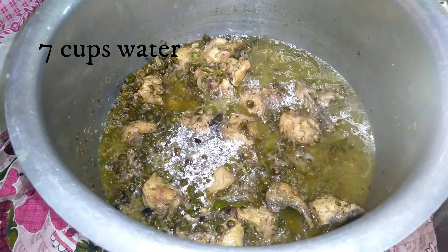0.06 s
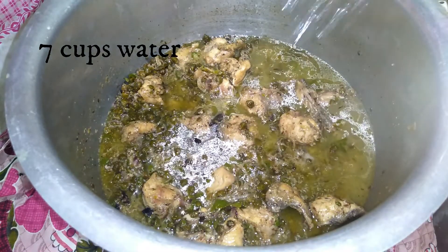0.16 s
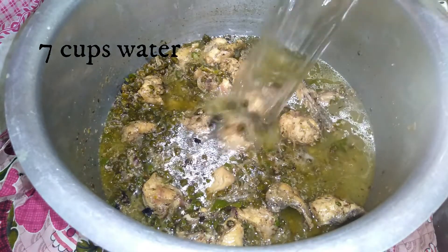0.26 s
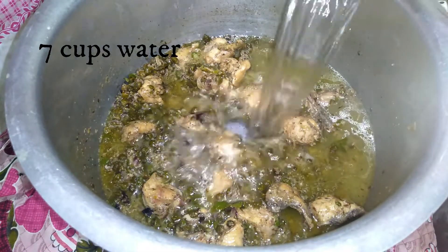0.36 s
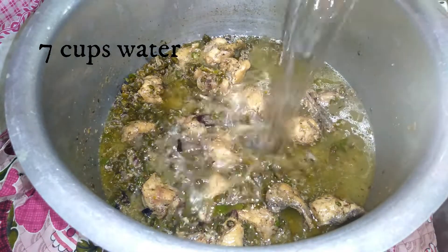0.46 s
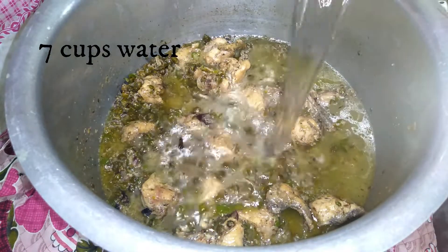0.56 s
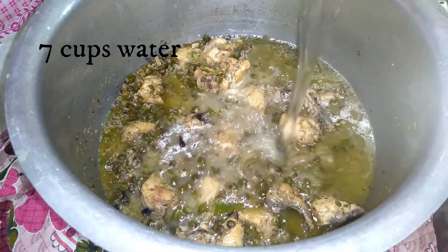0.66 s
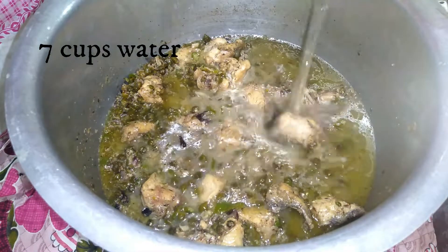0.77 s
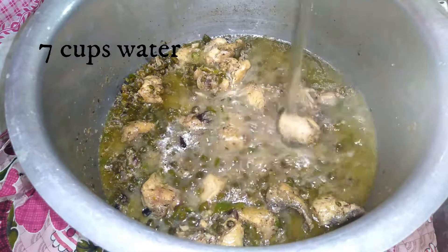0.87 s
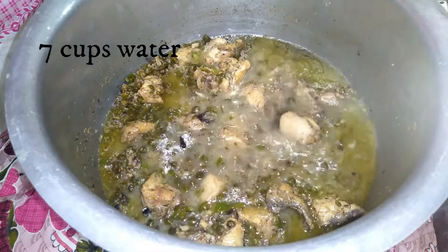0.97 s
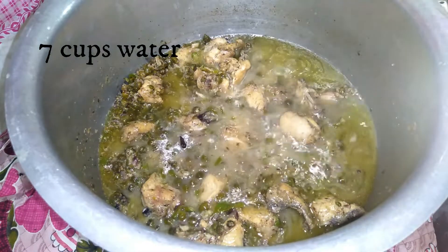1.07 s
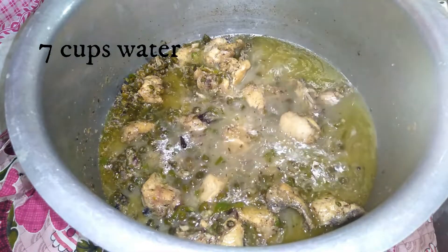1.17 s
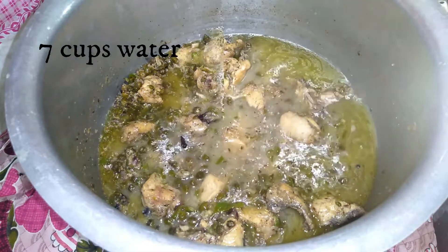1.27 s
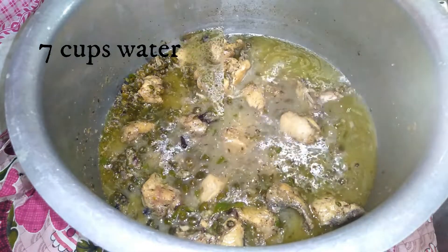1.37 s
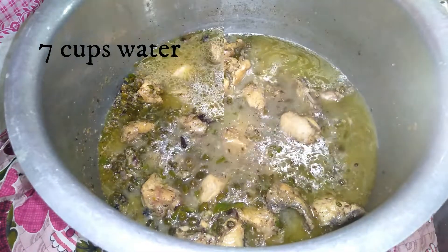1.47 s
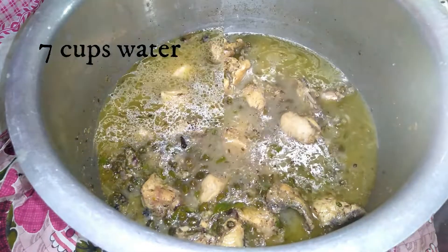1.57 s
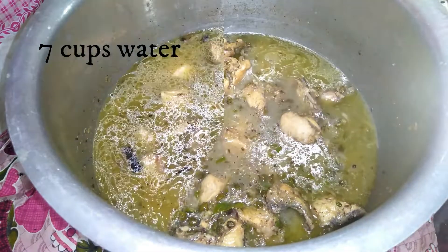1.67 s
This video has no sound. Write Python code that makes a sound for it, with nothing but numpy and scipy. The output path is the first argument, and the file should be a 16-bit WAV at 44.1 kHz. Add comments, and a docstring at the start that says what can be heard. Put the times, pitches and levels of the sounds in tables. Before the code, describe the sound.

Close in stereo, a stream of water hits a pot of frying masala, splattering and plopping with a hollow metallic ring, then dies away to delicate froth and oil spits over a very low kitchen hum.

```python
"""Over a low, wavering kitchen hum, the sizzle of masala rises in a large metal pot, close to a stereo
microphone: a dense cloud of very short rings, held under the pour. Water is poured in: clouds of short rings
make its splash, gurgle and spray, with single pops and plops. The pot's air rings along and its walls scatter
the sound. Then pour and sizzle fade, leaving soft prickles of froth and spitting oil, and the sizzle returns in
two surges, the second still growing when the sound ends."""
import sys
import numpy as np
from scipy import signal
from scipy.fft import rfft, irfft
from scipy.io import wavfile

SR = 44100
rng = np.random.default_rng(int(sys.argv[2]) if len(sys.argv) > 2 else 0)


def put_to_file(sound):
    """Save the sound as 16-bit audio at rate SR, in the file named by the first command-line argument."""
    columns = np.atleast_2d(sound).T  # one column per channel
    safe = np.clip(columns, -1, 1)
    whole_steps = np.round(safe * 32767)
    wavfile.write(sys.argv[1], SR, whole_steps.astype(np.int16))


N = 74970
T = np.arange(N) / SR  # time of each sample, s

# Layer levels below are set before the layer trims, the pot and the microphone.
# strength of the kitchen hum, added to the level of its tones [t/s, level/dB]
HUM_LEVEL = [(0, -4), (.07, -22), (.2, 1.5), (.45, 4), (.95, 2.5), (1.2, -7.5), (1.4, 0), (1.55, -9),
             (1.58, 3), (1.7, -5.5)]
# tones of the kitchen hum [f/Hz, level/dB]
HUM_TONES = [(131.8, -68), (113.8, -74)]
# outline of the low rumble [f/Hz, level/dB]
RUMBLE_OUTLINE = [(20, -9.5), (42, -19.5), (65, -0.5), (95, 4), (125, 0.5), (170, -9.5), (250, -23.5),
                  (450, -29), (1200, -38), (5000, -56), (15000, -34)]
# air resonances of the pot [f/Hz, level/dB, time to fall by 60 dB/s]
POT_RESONANCES = [(261.5, -11.5, 0.2), (352, -17, 0.15), (864, -8, 0.15), (910, -9, 0.095),
                  (1478, -1.5, 0.18), (1952.5, -1.5, 0.11), (2754, -15, .1), (3060, -4, .3)]
# the walls scatter mainly the treble [f/Hz, level/dB]
WALLS_OUTLINE = [(300, -17), (1000, -17.5), (2200, 3), (15000, -3)]
# level of the sizzle: a faint hiss rising by 0.17 s, held under the pour, fading, then returning # in two
# surges, the second lasting to the end [t/s, level/dB]
SIZZLE_LEVEL = [(0, -100), (.125, -93.5), (.17, -56.5), (.2, -60), (.235, -63), (1.0, -62.5), (1.2, -87),
                (1.38, -93.5), (1.408, -70), (1.45, -62), (1.49, -72.5), (1.555, -77), (1.595, -64),
                (1.7, -59.5)]
# outline of the sizzle [f/Hz, level/dB]
SIZZLE_OUTLINE = [(200, -14.5), (800, -26), (1250, -10.5), (2000, 0.5), (3700, 7), (4300, -2), (5800, 4.5),
                  (9000, -8.5), (15000, -16.5)]
# oil fizzing as the water settles [t/s, level/dB]
FIZZ_LEVEL = [(.95, -48), (1.08, -65.5), (1.19, -60), (1.26, -62.5), (1.36, -63.5), (1.45, -62), (1.5, -72),
              (1.55, -67), (1.6, -59), (1.7, -66)]
# outline of the fizz [f/Hz, level/dB]
FIZZ_OUTLINE = [(1000, -58), (3800, -16), (5200, -7.5), (7000, -4.5), (10000, -3), (12000, 1), (14500, 0.5)]
# small clusters of bubbles surfacing after the pour [t/s, level/dB]
FROTH_CLUSTERS = [(1.172, -74), (1.208, -83.5), (1.283, -73.5)]
# sharp drop slaps and oil spits [t/s, peak level/dB, f/Hz, ring time/ms]
POP_EVENTS = [(0.226, -31, 5500, 0.27), (0.234, -28, 10900, 0.45), (.2380, -14.5, 5640, 0.92),
              (0.3358, -18.5, 5200, 1.1), (0.4008, -21.5, 10860, 1.2), (0.406, -14, 10860, 0.77),
              (0.4697, -29, 4840, 0.47), (0.636, -24.5, 5840, 1.4), (.7270, -10, 5700, 0.54),
              (0.738, -17.5, 6200, 1.4), (0.8332, -21.5, 5020, 2.6), (0.9148, -26, 5510, 2.6),
              (1.1520, -29.5, 11500, 0.4), (1.1760, -35.5, 10750, 2.1), (1.2326, -38, 9600, 0.81),
              (1.2905, -43.5, 10200, 2.5), (1.349, -41, 10130, 0.67), (1.356, -44.5, 10500, .7),
              (1.4318, -37.5, 10370, 0.48), (1.4613, -38, 9970, 1.3), (1.554, -33.5, 11200, 0.46)]
# larger bubbles and plunges [t/s, peak level/dB, f/Hz, ring time/ms]
PLOP_EVENTS = [(0.237, -56.5, 208, 11), (.243, -60, 764, 25), (0.242, -29, 1470, 1.9),
               (0.322, -43, 352, 33), (.342, -27.5, 2264, 3.9), (.395, -25, 2330, 3.3),
               (0.427, -21, 2570, 4.8), (0.4796, -23.5, 3020, 3.7), (.507, -38, 904, 3.9),
               (0.505, -24, 2675, 3.3), (0.5192, -16, 2735, 1.9), (.525, -32, 1990, 6.5),
               (0.696, -44.5, 275.4, 12), (0.738, -28.5, 1496, 4), (0.752, -37.5, 1520, 22),
               (1.049, -58, 274, 20)]
# fine spray thrown up by the stream [t/s, level/dB]
SPRAY_LEVEL = [(.2, -85), (.25, -58), (.262, -43), (.29, -41), (.34, -41), (.362, -45), (.41, -44),
               (.53, -47), (.575, -50), (.715, -51), (.73, -44), (.83, -44.5), (.96, -48), (1.01, -57),
               (1.1, -68), (1.22, -80)]
# outline of the spray [f/Hz, level/dB]
SPRAY_OUTLINE = [(300, -36), (2000, -20.5), (3500, -1), (4800, -0.5), (6500, 1), (8000, -3), (10500, -2.5),
                 (15000, -7.5)]
# water plunging into the pool, then settling [t/s, level/dB]
GURGLE_LEVEL = [(.22, -84), (.24, -74.5), (.293, -82), (.312, -51.5), (.47, -51), (.515, -48.5), (.56, -50),
                (.67, -59), (.88, -54.5), (.97, -60.5), (1.1, -85.5), (1.16, -89.5), (1.2, -99),
                (1.53, -101), (1.58, -100), (1.7, -100)]
# outline of the gurgle [f/Hz, level/dB]
GURGLE_OUTLINE = [(60, -28), (140, -7), (250, 3), (400, 2), (650, -1.5), (880, 4.5), (1250, -3.5),
                  (2500, -17), (8000, -54.5)]
# the stream breaking on the food [t/s, level/dB]
SPLASH_LEVEL = [(0.22, -66.5), (0.26, -41.5), (0.282, -42.5), (0.298, -38.5), (0.326, -44.5), (0.342, -32),
                (0.356, -44.5), (0.493, -41), (0.508, -33), (0.53, -39.5), (0.544, -44.5), (0.688, -51.5),
                (0.734, -42.5), (0.89, -49.5), (0.948, -45), (1.038, -68), (1.2, -91.5)]
# outline of the splash [f/Hz, level/dB]
SPLASH_OUTLINE = [(150, -24), (700, -29.5), (1200, -14), (1500, -2), (2000, -4), (2850, 1), (3600, -1.5),
                  (4400, -7.5), (8000, -23.5), (15000, -67)]
# tone of the left microphone port [f/Hz, level/dB]
LEFT_OUTLINE = [(100, 4), (1400, 2.5), (2500, 2), (3400, -1), (4500, 5.5), (5700, 9), (6700, 5),
                (8000, -2.5), (9200, -8), (11000, -13), (14000, -18.5)]
# tone of the right microphone port [f/Hz, level/dB]
RIGHT_OUTLINE = [(100, 4.5), (1400, 2.5), (3000, -2.5), (4500, 1.5), (6200, -1), (8200, 3.5), (9400, 7),
                 (10300, 9.5), (11200, 4), (12200, 2), (14000, -3)]

# trims of whole layers, dB
RUMBLE_DB, SIZZLE_DB, SPRAY_DB, GURGLE_DB, SPLASH_DB = -72, 1.5, 3, 1, 0
# pops: trim, share of crack noise, its fading time, rise time, its spread around the pitch
POP_DB, POP_CRACK, CRACK_S, POP_RISE_S, CRACK_OCTAVES = -1.5, 0.52, 0.00081, 0.0001, 1
# plops: trim, rise time, phase speed-up per ring time (a share)
PLOP_DB, PLOP_RISE_S, PLOP_GLIDE = -3.5, 0.0027, 0.0037
FROTH_S = 0.014  # half-width of a cluster, where it has sunk to 1/e
# levels of pot resonances, walls and room, and the times their echoes take to fall by 60 dB
POT_DB, WALLS_DB, WALLS_T60_S, ROOM_DB, ROOM_T60_S = 10.5, -1, 0.03, -8, 0.13
PLACES_PER_S = 100  # how often the sound moves to another place in the pot
DIRECT = 0.11  # share of pops and plops that reaches the microphone directly
EDGE_HZ = 14450  # upper band limit


def amp(db):
    """Turns decibels into a gain."""
    return 10 ** (np.asarray(db) / 20)


def evened(x):
    """Scales a sound to an rms strength of one."""
    return x / np.sqrt(np.mean(x ** 2) + 1e-20)


def level(curve):
    """Follows a (t/s, level/dB) curve as a gain, falling by 600 dB per second outside it."""
    s, db = np.transpose(curve)
    outside_s = abs(T - np.clip(T, s[0], s[-1]))
    return amp(np.interp(T, s, db) - 600 * outside_s)


def convolve(x, h):
    """Filters each channel, keeping the length."""
    return signal.fftconvolve(np.atleast_2d(x), np.atleast_2d(h), axes=1)[:, :N]


def colour(x, outline, size=4096):
    """Filters to an (f/Hz, level/dB) outline, never answering before the sound arrives."""
    f, db = np.transpose(outline)
    log_f = np.log(abs(np.fft.fftfreq(size, 1 / SR)) + 1)
    log_gain = np.log(amp(np.interp(log_f, np.log(f), db)))
    # the Hilbert transform supplies the phase that packs the response towards its start
    response = np.fft.ifft(np.exp(np.conj(signal.hilbert(log_gain)))).real
    return convolve(x, response[:size // 2])


def drift(hz, count=24):
    """Adds sines of random phase, up to the given rate, into a wander of unit rms."""
    rates = np.geomspace(hz / 10, hz, count)
    return evened(sum(np.sin(2 * np.pi * (f * T + rng.random())) for f in rates))


def bubbles(per_s, low_hz, high_hz, cycles, spread_db, glide, apart, count=32):
    """Scatters short rings of random size, each pitch group at its own place; glide lifts the pitch."""
    out = np.zeros((2, N))
    for hz in np.linspace(low_hz, high_hz, count):
        chance = rng.random(N)
        size = np.minimum(rng.exponential(1, N), 4)
        place = rng.uniform(-1, 1)
        hits = (chance < per_s / count / SR) * amp(spread_db * size) * rng.choice([-1, 1], N)
        # the place sets how late the ring arrives left and right (apart is in ms)
        delay_s = apart / 1000 * np.array([[1 + place], [1 - place]])
        age = np.maximum(T[:N // 16] - delay_s, 0) * hz / cycles
        phase = 2 * np.pi * cycles * age * (1 + glide * np.minimum(age, 2))
        ring = np.exp(-age) * np.sin(phase)
        out += convolve(hits, ring / np.linalg.norm(ring[0]))
    return evened(out)


def kitchen():
    """A hum of steady pitches, wavering in level and phase, over low rumble made of noise."""
    noise = rng.standard_normal((3, N))
    shared, separate = noise[2], noise[:2]
    rumble = amp(RUMBLE_DB) * evened(colour(shared + 0.4 * separate, RUMBLE_OUTLINE))
    hum = 0
    for hz, db in HUM_TONES:
        gain = amp(db + 0.73 * drift(26)) * np.sqrt(2)  # sqrt(2) turns rms into peak
        hum = hum + gain * np.sin(2 * np.pi * hz * T + 0.56 * drift(17))
    return rumble + hum * level(HUM_LEVEL)


def echoes(t60, low_hz):
    """A dying scatter of reflections made of noise, alike at both ports in the bass."""
    noise = rng.standard_normal((3, N // 4))
    low = signal.butter(2, low_hz, "low", fs=SR)
    high = signal.butter(2, low_hz, "high", fs=SR)
    t = T[:N // 4]
    tail = signal.lfilter(*low, noise[2]) + signal.lfilter(*high, noise[:2])
    tail = tail * amp(-60 * t / t60) * (t > .001)  # silent for the first millisecond
    return tail / np.linalg.norm(tail, axis=1, keepdims=True)


def scatter(x, count=8):
    """Drops land all over the pot, so the sound fades in turn between patterns of wall reflections."""
    out = np.zeros((2, N))
    for k in range(count):
        away = (T * PLACES_PER_S - k) % count - count / 2
        share = np.cos(np.pi / 2 * np.clip(away, -1, 1))
        out += convolve(x * share, echoes(WALLS_T60_S, low_hz=700))
    return out


def pot(x):
    """The pot's air rings, its walls scatter the sound, and the kitchen answers faintly."""
    t = T[:N // 4]
    modes = 0
    for hz, db, t60 in POT_RESONANCES:
        decay = np.log(1000) / t60  # per second
        gain = amp(db + POT_DB) * 2 * decay / SR
        modes = modes + gain * np.exp(-decay * t) * np.cos(2 * np.pi * hz * t)
    walls = amp(WALLS_DB) * colour(scatter(x), WALLS_OUTLINE)
    room = amp(ROOM_DB) * echoes(ROOM_T60_S, low_hz=500)
    return (x + walls + convolve(x, modes + room)) / np.sqrt(1 + amp(WALLS_DB) ** 2)


def sizzle():
    """Dense, uneven crackle of the frying masala, from very short rings without glide."""
    cloud = bubbles(per_s=9000, low_hz=977, high_hz=12840, cycles=1.5, spread_db=2.5, glide=0, apart=0.093)
    return evened(colour(cloud, SIZZLE_OUTLINE)) * level(SIZZLE_LEVEL) * amp(SIZZLE_DB)


def fizz():
    """Very small bubbles prickle on the hot surface as short, high rings."""
    cloud = bubbles(per_s=5000, low_hz=4540, high_hz=14020, cycles=3.4, spread_db=5.0, glide=0.014, apart=0.14)
    return evened(colour(cloud, FIZZ_OUTLINE)) * level(FIZZ_LEVEL)


def froth():
    """Each cluster of bubbles breaks in a soft, brief prickle of longer rings."""
    cloud = bubbles(per_s=2500, low_hz=2873, high_hz=4060, cycles=18, spread_db=-1.0, glide=0.014, apart=0.09)
    return cloud * sum(amp(db) * np.exp(-((T - s) / FROTH_S) ** 2) for s, db in FROTH_CLUSTERS)


def pops():
    """Single bursts: a brief ring and a crack of noise spread around its pitch."""
    out = np.zeros((2, N))
    f = np.fft.rfftfreq(N, 1 / SR) + 1
    for s, db, hz, ring_ms in POP_EVENTS:
        t = np.maximum(T - s, 0)
        ring = np.sin(2 * np.pi * hz * t) * np.exp(-1000 * t / ring_ms)
        octaves_off = np.log2(f / hz)
        spectrum = rfft(rng.standard_normal((2, N))) / (1 + (octaves_off / CRACK_OCTAVES) ** 2)
        crack = evened(irfft(spectrum, N)) * np.exp(-t / CRACK_S)
        rise = np.minimum(t / POP_RISE_S, 1)
        out += amp(db + POP_DB) * rise * (0.82 * ring + POP_CRACK * crack)
    return colour(out, [(300, -36), (1800, -19), (4000, -5.5), (14000, 0.5)])  # mostly treble


def plops():
    """Trapped air rings and rises slightly in pitch."""
    out = np.zeros(N)
    for s, db, hz, ring_ms in PLOP_EVENTS:
        t = np.maximum(T - s, 0)
        age = 1000 * t / ring_ms
        turns = hz * t * (1 + PLOP_GLIDE * age) + rng.random()
        rise = np.minimum(t / PLOP_RISE_S, 1)
        out += amp(db + PLOP_DB) * rise * np.exp(-age) * np.sin(2 * np.pi * turns)
    return out


def spray():
    """Tiny droplets and bubbles burst in hot fat as high rings of flickering level."""
    cloud = bubbles(per_s=6600, low_hz=2705, high_hz=14440, cycles=3.8, spread_db=3.5, glide=0.0078, apart=0.1522)
    return evened(colour(cloud, SPRAY_OUTLINE)) * level(SPRAY_LEVEL) * amp(SPRAY_DB + drift(110))


def gurgle():
    """Large bubbles and dull slaps where the stream enters the pool, as low rings."""
    cloud = bubbles(per_s=1200, low_hz=139.8, high_hz=1450, cycles=2.58, spread_db=3.0, glide=0.017, apart=0.2)
    return evened(colour(cloud, GURGLE_OUTLINE)) * level(GURGLE_LEVEL) * amp(GURGLE_DB)


def splash():
    """The stream shatters into drops (short rings) and small bubbles (longer rings), in uneven clumps."""
    drops = bubbles(per_s=3500, low_hz=738, high_hz=5250, cycles=1.9, spread_db=4, glide=0.038, apart=0.062)
    rings = bubbles(per_s=300, low_hz=896.5, high_hz=4531, cycles=15, spread_db=4.5, glide=0.0093, apart=0.13)
    water = evened(colour(drops + 0.63 * rings, SPLASH_OUTLINE))
    return water * level(SPLASH_LEVEL) * amp(SPLASH_DB + 1.3 * drift(60))


def scene():
    """Everything rings in the pot, over the kitchen; a share of the pops and plops goes around the pot."""
    bursts = pops() + plops()
    water = splash() + gurgle() + spray()
    frying = sizzle() + fizz() + froth()
    return pot(water + frying + (1 - DIRECT) * bursts) + DIRECT * bursts + kitchen()


def record(dry):
    """Each microphone port has its own treble resonance; then the band limit cuts the top."""
    heard = np.vstack([colour(dry[0], LEFT_OUTLINE), colour(dry[1], RIGHT_OUTLINE)])
    low_pass = signal.firwin(301, EDGE_HZ, window=("kaiser", 8), fs=SR)
    return signal.oaconvolve(heard, low_pass[None], "same")


dry = scene()
out = record(dry)
put_to_file(out)
```